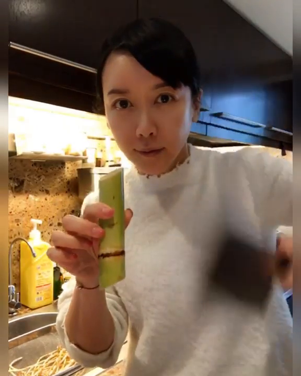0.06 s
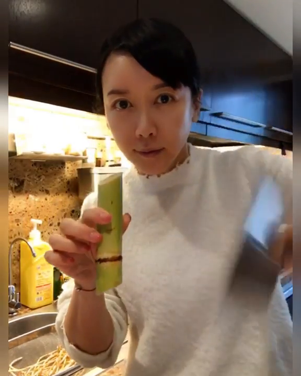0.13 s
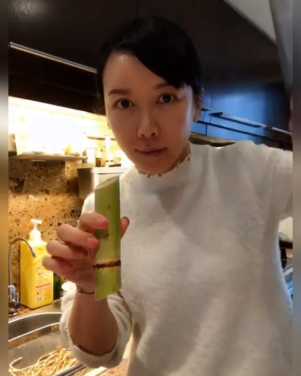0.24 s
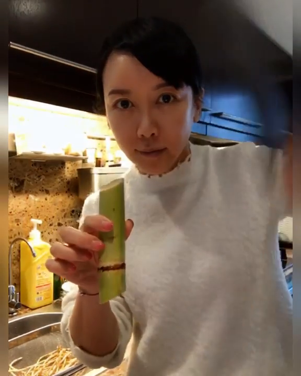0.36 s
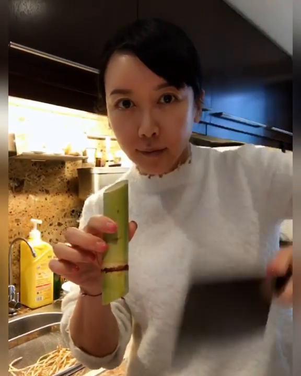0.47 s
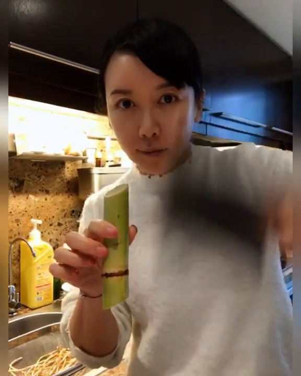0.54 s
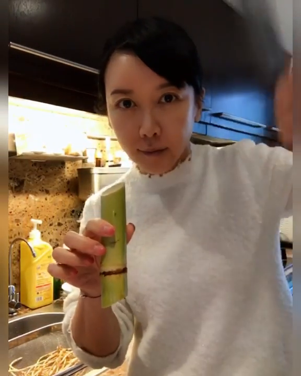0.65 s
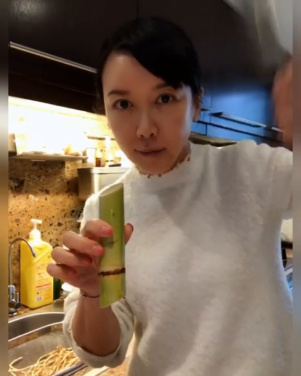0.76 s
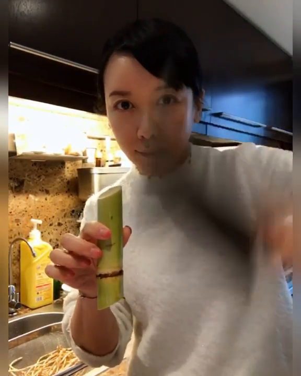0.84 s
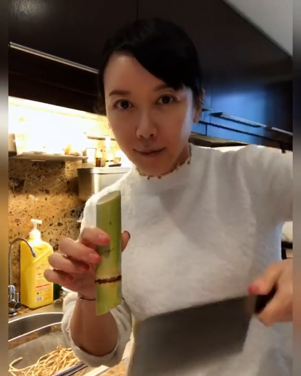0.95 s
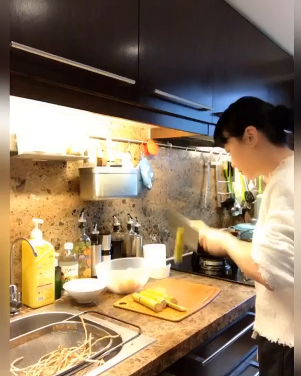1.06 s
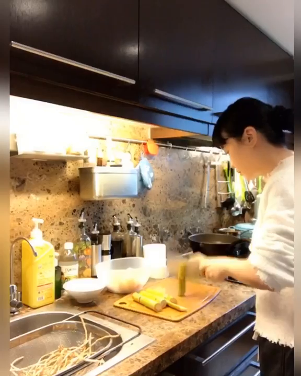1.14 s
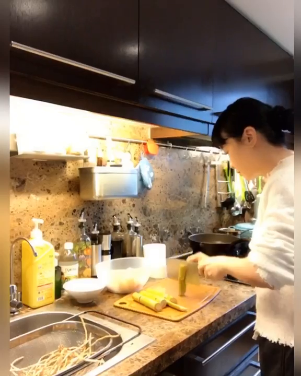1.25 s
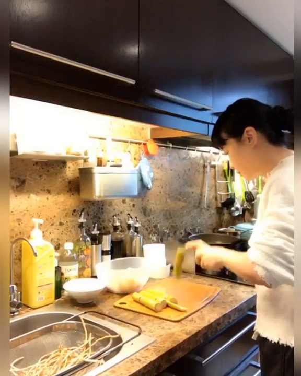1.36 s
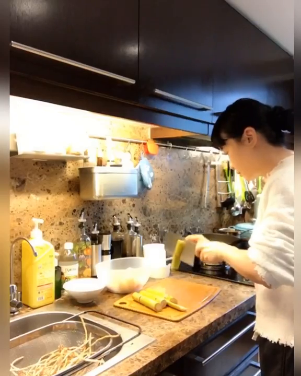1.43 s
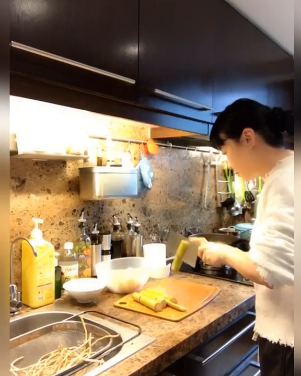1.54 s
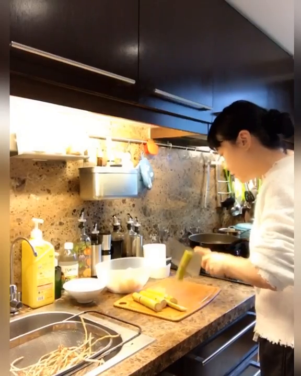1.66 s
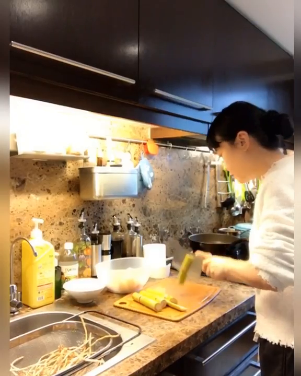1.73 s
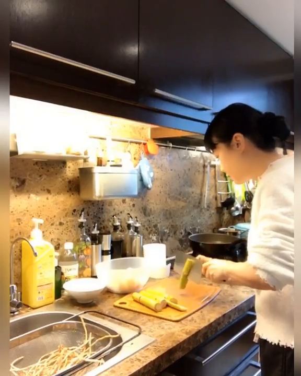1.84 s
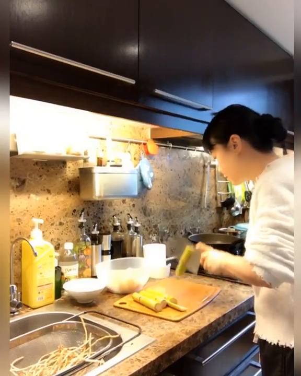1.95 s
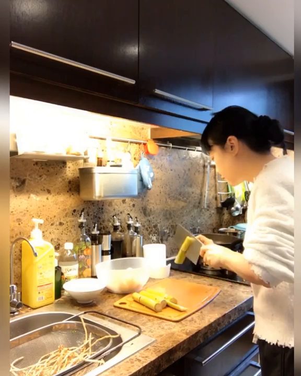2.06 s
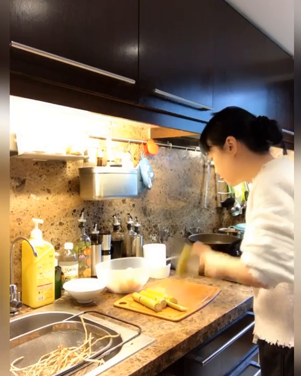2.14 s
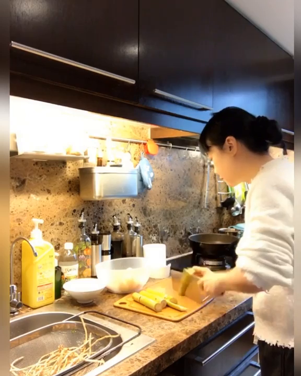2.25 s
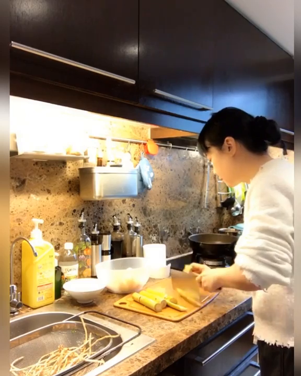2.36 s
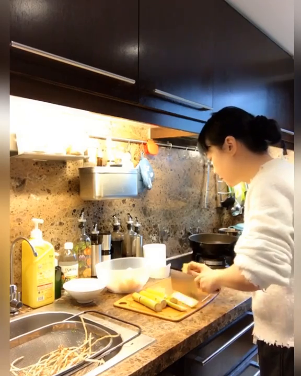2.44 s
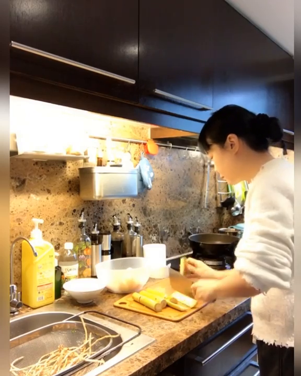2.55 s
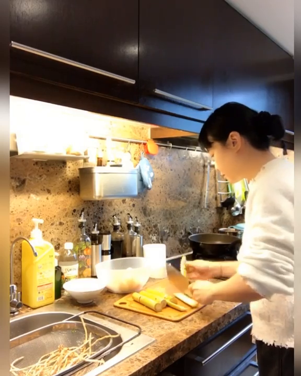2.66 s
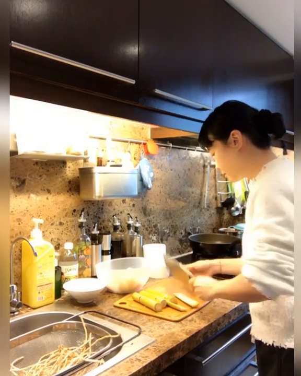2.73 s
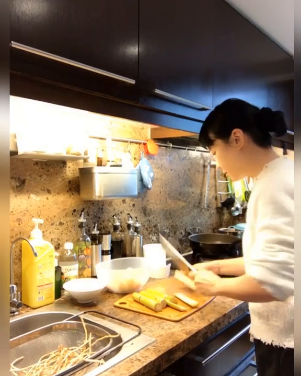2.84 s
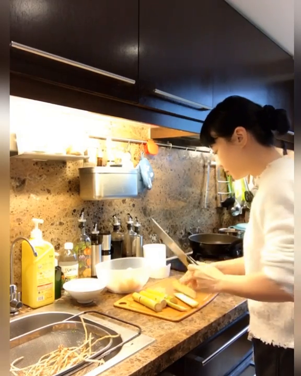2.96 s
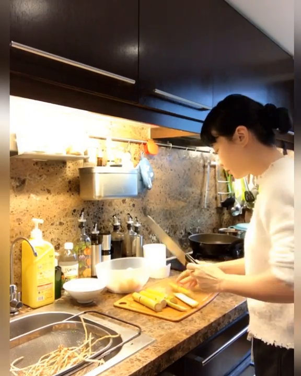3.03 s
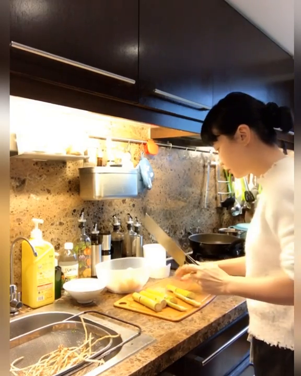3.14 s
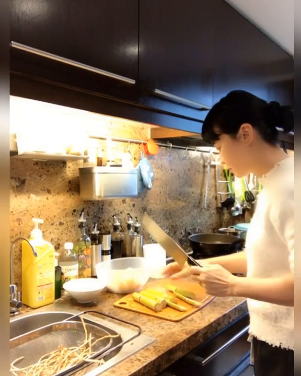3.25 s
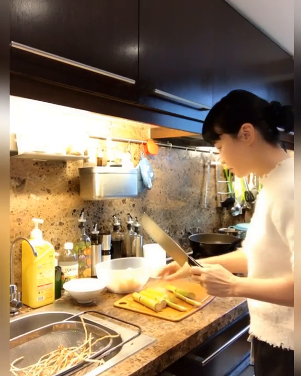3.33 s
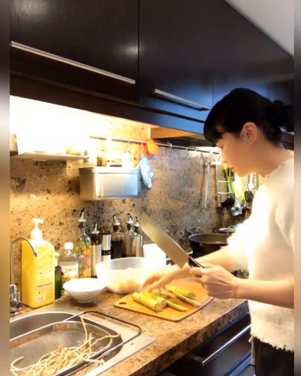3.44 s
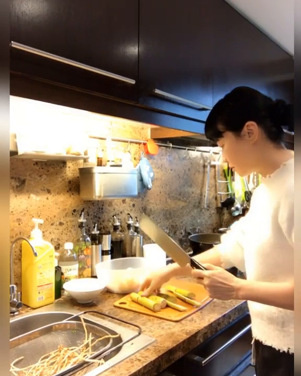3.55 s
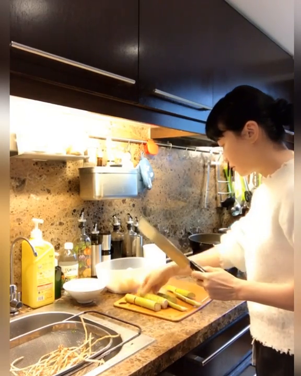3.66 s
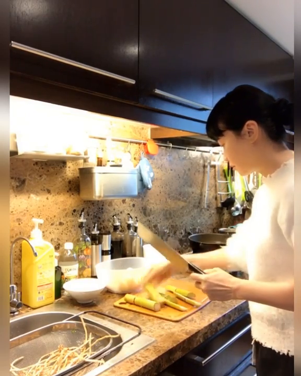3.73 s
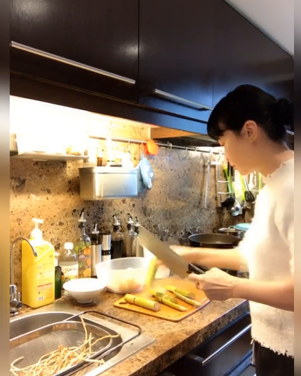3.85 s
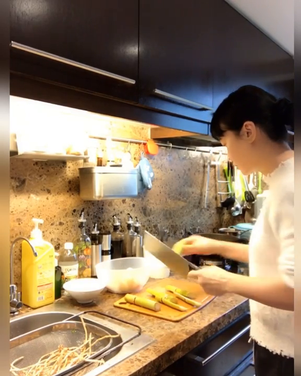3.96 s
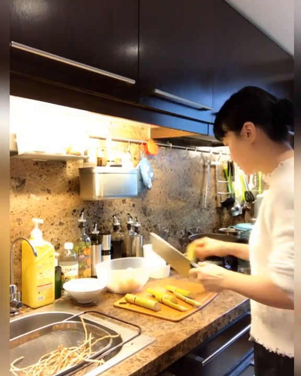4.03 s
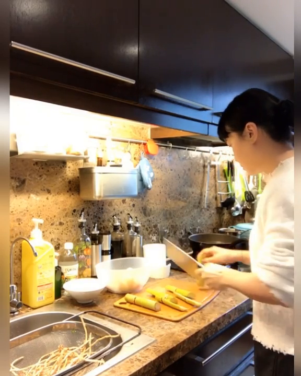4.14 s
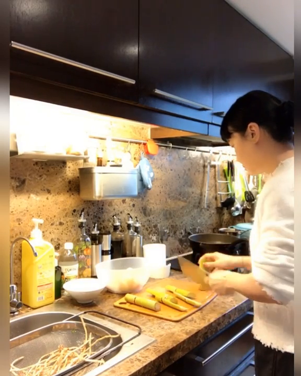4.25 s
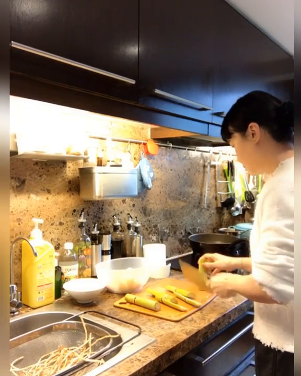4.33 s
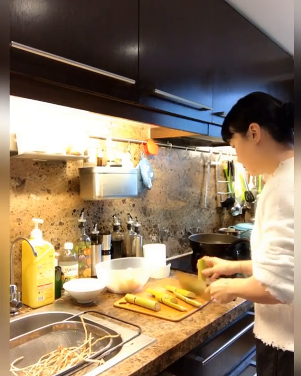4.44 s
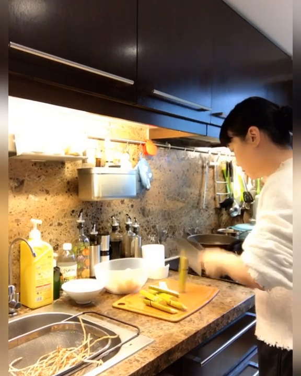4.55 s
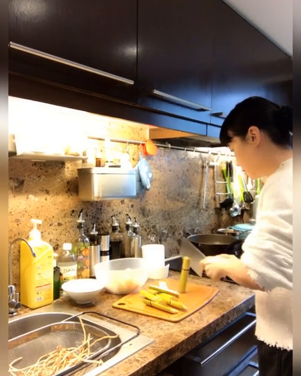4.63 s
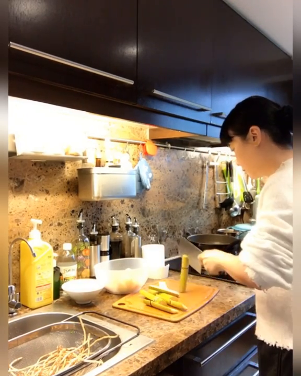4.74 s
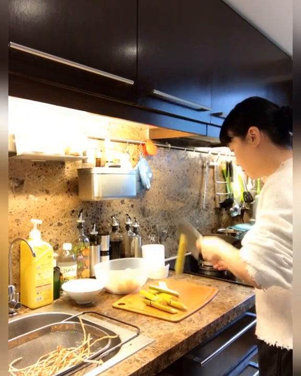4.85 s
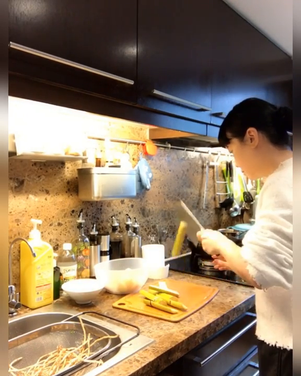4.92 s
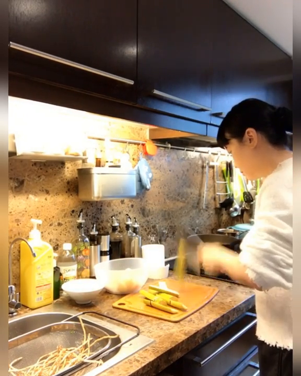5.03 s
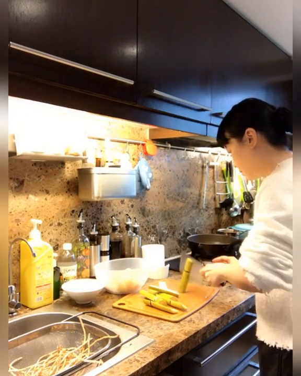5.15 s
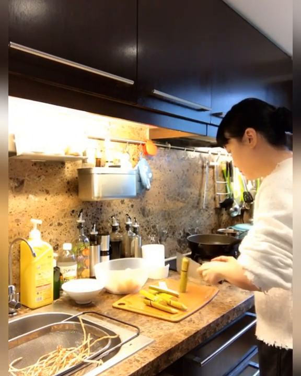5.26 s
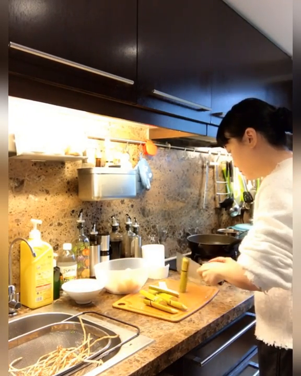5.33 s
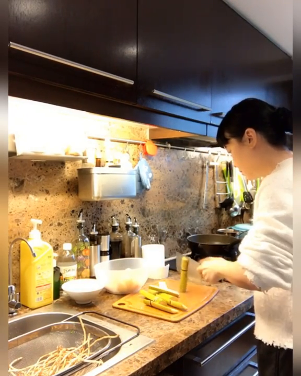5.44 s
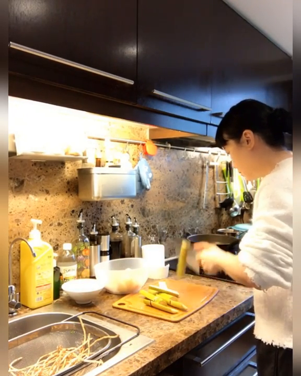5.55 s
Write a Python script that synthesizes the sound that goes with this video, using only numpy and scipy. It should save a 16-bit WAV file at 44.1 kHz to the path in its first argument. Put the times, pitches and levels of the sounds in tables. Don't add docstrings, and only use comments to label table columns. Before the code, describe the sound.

In a small tiled kitchen, a hood hisses and fans drone. After a faint knock and a thin swish, a cleaver chops cane with a woody thud and crack. A heavier multiple blow follows, then scrapes, taps and pieces set down, a bright steel clink, and two last splitting blows, the final one loud and sharp. Picked up by a phone a metre or two away.

```python
import sys
import numpy as np
from scipy import signal
from scipy.fft import rfft, irfft
from scipy.io import wavfile
from scipy.ndimage import uniform_filter1d

SR = 44100
rng = np.random.default_rng(int(sys.argv[2]) if len(sys.argv) > 2 else 0)


def master(y):
    cut = np.clip(np.atleast_2d(y).T, -1, 1)
    pcm = np.round(cut * 32767)
    wavfile.write(sys.argv[1], SR, pcm.astype(np.int16))


def to_linear_factor(level_db):
    exponent = np.asarray(level_db, float) / 20
    return 10 ** exponent


N = 246519
T = np.arange(N) / SR
HALF_S = T[:SR // 2]


def band(x, lo_hz, hi_hz, order=2):
    return signal.sosfilt(signal.butter(order, [lo_hz, hi_hz], "bandpass", fs=SR, output="sos"), x)


def unit(x):
    return x / np.sqrt(np.mean(x ** 2))


def noise():
    return rng.standard_normal(N)


def strikes(start_s, gains):
    return np.bincount((np.asarray(start_s) * SR).astype(int), gains, N)


def ring(x, pitch_hz, t60_s):
    decay = np.log(1000) / (max(t60_s, .005) * SR)
    pole = np.exp(2j * np.pi * pitch_hz / SR - decay)
    return signal.lfilter([1], [1, -pole], x).imag


def burst(x, rise_s, fall_s):
    shape = (1 - np.exp(-HALF_S / rise_s)) * np.exp(-HALF_S / fall_s)
    return np.maximum(signal.fftconvolve(x, shape / shape.max())[:N], 0)


def walk(rate_hz):
    hold = int(SR / rate_hz)
    steps = np.repeat(rng.standard_normal(N // hold + 1), hold)
    w = uniform_filter1d(uniform_filter1d(steps, hold), hold)[:N]
    return w / w.std()


def curve(table):
    return np.interp(T, *np.transpose(table))


def on_log(table, pitch_hz):
    hz, value = np.transpose(table)
    return np.interp(np.log(pitch_hz), np.log(hz), value)


# (pitch_hz, level_db per Hz)
HOOD_SPECTRUM = [(59, -56), (100, -6), (122, -14.5), (166, -4.5), (234, -7.5), (253, -13.5), (343, -12.5),
                 (403, -18), (738, -21), (800, -19.5), (3100, -32), (9210, -42), (12500, -40.5),
                 (16200, -125), (22000, -120)]
# (start_s, level_db)
HOOD_SWELL = [(0, 0), (4.3, -0.6), (4.9, 2)]
# (pitch_hz, width_hz, level_db)
RUMBLE = [(28.2, 32, -48.5), (45, 22, -47), (64.17, 14, -53.5), (156, 22, -60), (360.7, 29, -68)]
# (pitch_hz, level_db, wobble_hz)
DRONES = [(47.8, -44.5, 3.0), (77.2, -50.5, 5.6)]
# (start_s, fan_db, compressor_db)
DRONE_LOAD = [(0, -4, -5), (.42, -0.5, -4), (.55, 6.5, -6), (1.0, 5, 0), (1.301, -2, 2.5), (2.0, 0, 2.5),
              (2.6, 1.5, 0), (4.0, -3.5, 0.5), (4.45, 2.5, -1), (5.59, 1, -1)]
# (start_s, gain_db)
SCENE_CHANGE = [
    (1.035, 0.5),
    (1.062, 0.5),
    (1.078, -5),
    (1.09, 0.5),
]


def machines():
    hz = np.maximum(np.fft.rfftfreq(N, 1 / SR), 1)
    shape = to_linear_factor(on_log(HOOD_SPECTRUM, hz)) * (hz > 95)
    hood_db = -52.5
    out = unit(irfft(rfft(noise()) * shape, N)) * to_linear_factor(hood_db + curve(HOOD_SWELL))
    for pitch_hz, width_hz, level_db in RUMBLE:
        out += to_linear_factor(level_db) * unit(band(noise(), pitch_hz - width_hz / 2, pitch_hz + width_hz / 2))
    start_s, *loads_db = np.transpose(DRONE_LOAD)
    for (pitch_hz, level_db, wobble_hz), load_db in zip(DRONES, loads_db):
        tone = np.sin(2 * np.pi * np.cumsum(pitch_hz + wobble_hz * walk(11)) / SR)
        waver_db = 1.9 * walk(5) + 3.6 * walk(12)
        out += to_linear_factor(4 + level_db + np.interp(T, start_s, load_db) + waver_db) * tone
    return out * to_linear_factor(curve(SCENE_CHANGE))


# (start_s, push_db, contact_ms, snap_db)
CANE = [(0.019, -50, 3.7, -46), (1.079, -23, 1.54, -20), (2.145, -17.5, 2.25, -29), (2.149, -13, 2.4, -38),
        (2.171, -14, 1.144, -22.5), (2.31, -28, 3.1, -43), (2.386, -44.5, 1.16, -88),
        (2.847, -38, 16, -64.5), (2.896, -50, 2.7, -68), (2.944, -29.5, 6.1, -76.5), (2.974, -55, 2.4, -73),
        (3.008, -50.5, 4.7, -54), (4.197, -29, 4.4, -68), (4.224, -42, 13, -77.5), (4.553, -20.5, 3.5, -48),
        (4.562, -20, 1.5, -43.5), (5.018, -15, 1.83, -20.5), (5.021, -10, 1.69, -19)]
# (start_s, push_db, contact_ms, tick_db)
EDGES = [
    (1.083, -11, 3.8, -18),
    (2.327, -43, 3.4, -58),
    (2.393, -27.5, 1.87, -65),
    (2.516, -31, 5.4, -58),
    (3.377, -49.5, 6.7, -47.5),
    (3.43, -42.5, 2.13, -50.5),
    (3.456, -54, 1.9, -64),
    (3.497, -62, 3.1, -57),
    (3.59, -43, 2.44, -52),
]
# (start_s, push_db, contact_ms, tick_db)
STEEL = [
    (2.546, -38, 12, -41),
    (4.406, -30, 1.19, -26),
    (4.429, -43.5, 0.76, -30),
    (4.454, -47, 3.3, -19),
]
BAND_HZ = (130, 350, 900, 2200, 5000, 11500)
PUSH_DB = (-1, 9, 24.5, 17, 0)
SNAP_DB = (-30.5, -13.5, -10.5, -1, 1.5)
TICK_DB = (-33.5, -19, -6, 1, -7)


def range_levels(rows, sharp_db):
    _, push_db, contact_ms, edge_db = np.transpose(rows)
    mid_hz = np.sqrt(np.multiply(BAND_HZ[:-1], BAND_HZ[1:]))[:, None]
    soft_db = 38 * np.log10(1 + (mid_hz * contact_ms * 1e-3) ** 2)
    body_db = push_db + np.reshape(PUSH_DB, (-1, 1)) - soft_db + soft_db[0]
    top_db = edge_db + np.reshape(sharp_db, (-1, 1))
    return 20 * np.log10(np.hypot(to_linear_factor(body_db), to_linear_factor(top_db)))


def contacts():
    start_s = np.transpose(CANE + EDGES + STEEL)[0]
    return start_s, np.hstack([range_levels(CANE, SNAP_DB), range_levels(EDGES + STEEL, TICK_DB)])


# (rise_s, fall_s, level_db, early_fall_s, early_db, late_fall_s, late_db)
RANGES = [(0.0026, 0.012, -15, 0.035, -13, 0.078, -24.5), (0.00092, 0.0023, -6, 0.034, -10.5, 0.046, -11.5),
          (0.0012, 0.0037, -0.5, 0.017, -8, 0.073, -19), (.0005, 0.004, 1, 0.0084, -11, .055, -16),
          (0.00066, 0.0029, -1, 0.018, -4, 0.061, -16)]


def cracks(start_s, levels_db):
    grains = noise() * to_linear_factor(4.4 * noise())
    out = 0
    for range_db, (rise_s, fall_s, level_db, *_), lo_hz, hi_hz in zip(levels_db, RANGES, BAND_HZ, BAND_HZ[1:]):
        envelope = burst(strikes(start_s, to_linear_factor(range_db)), rise_s, fall_s)
        out = out + to_linear_factor(level_db) * envelope * unit(band(grains, lo_hz, hi_hz))
    return out


def wash(start_s, levels_db):
    share_db = -2.5 * (np.arange(len(start_s)) >= len(CANE + EDGES))
    out = 0
    for range_db, (*_, early_s, early_db, late_s, late_db), lo_hz, hi_hz in zip(
            levels_db, RANGES, BAND_HZ, BAND_HZ[1:]):
        blows = strikes(start_s, to_linear_factor(range_db + share_db))
        spread = to_linear_factor(early_db) * burst(blows, 0.0023, early_s) + to_linear_factor(late_db) * burst(blows, 0.0074, late_s)
        out = out + spread * unit(band(noise(), lo_hz, hi_hz))
    return out


# (pitch_hz, level_db, t60_s)
BOARD = [(473, -6.5, 0.092), (510, -17, 0.067), (554.3, -7, 0.23), (612, -9.5, 0.18), (700, -8.5, 0.1),
         (811, -8, 0.13), (870, -14, 0.12), (911, -16, 0.088), (979, -6, 0.19), (1112, -4, 0.13),
         (1213, -5.5, 0.087), (1345, -7, 0.076), (1443, -3, 0.16), (1436, -8, .12)]
# (pitch_hz, level_db, t60_s)
COUNTER = [(77, -12.5, 0.49), (150, -9, 0.14), (170.2, -1.5, .33), (185.8, 5.5, 0.052), (231, -7.5, 0.29),
           (270, -13.5, 0.073), (314, -17, 0.13), (393, -11, 0.13)]


def thuds(start_s, levels_db):
    board, counter = np.zeros(N), np.zeros(N)
    for pitch_hz, level_db, t60_s in BOARD:
        spot = rng.standard_normal(len(start_s))
        range_db = levels_db[1 + (pitch_hz > BAND_HZ[2])]
        push = strikes(start_s + .001, np.sign(spot) * to_linear_factor(range_db + 2.7 * spot))
        board += to_linear_factor(level_db + 3.5) * ring(push, pitch_hz, .6 * t60_s)
    for k, (pitch_hz, level_db, t60_s) in enumerate(COUNTER):
        spot = rng.standard_normal(len(start_s))
        push = strikes(start_s + .004, to_linear_factor(levels_db[0] + 2 * spot))
        counter += (-1) ** k * to_linear_factor(level_db - 2.5) * ring(push, pitch_hz, t60_s)
    counter += to_linear_factor(-1.5) * ring(strikes(start_s + .002, to_linear_factor(levels_db[0])), 207, 0.03)
    return board + band(counter, 44, 500)


# (pitch_hz, t60_s)
KITCHEN_T60 = [(250, .35), (700, 0.82), (1800, 0.4), (4000, 0.1), (7000, 0.22), (11000, 0.28)]


def kitchen(x, wet_db, gap_s=0.001, build_s=0.005):
    tail = 0
    for pitch_hz in 300 * 2 ** np.arange(0, 5.4, .25):
        part = band(rng.standard_normal(len(HALF_S)), pitch_hz / 1.09, pitch_hz * 1.09)
        part = part * to_linear_factor(-60 * HALF_S / on_log(KITCHEN_T60, pitch_hz))
        tail = tail + unit(part) * np.sqrt(pitch_hz)
    tail *= 1 - np.exp(-np.maximum(HALF_S - gap_s, 0) / build_s)
    return to_linear_factor(wet_db) * signal.fftconvolve(x, tail / np.sqrt(np.sum(tail ** 2)))[:N]


# (start_s, length_s, pitch_hz, glide_hz_per_s, level_db)
SWISHES = [
    (.66, 0.39, 3270, 797, -66),
    (1.96, 0.17, 3100, -200, -59),
]


def swish():
    out, fade_s = 0, .04
    for start_s, length_s, pitch_hz, glide_hz_per_s, level_db in SWISHES:
        age_s = T - start_s
        tone = np.sin(2 * np.pi * (pitch_hz + glide_hz_per_s * age_s / 2) * age_s)
        fade = np.clip(np.minimum(age_s, start_s + length_s - T) / fade_s, 0, 1)
        out = out + to_linear_factor(level_db - 5.5) * fade * tone * walk(470)
    return out


# (start_s, level_db)
SHAKES = [
    (1.084, -19),
    (2.172, -11),
    (4.562, -21),
    (5.021, -15),
]
# (pitch_hz, level_db, t60_s)
BOWLS = [(2116, -15, .5), (2127, -22, .35), (2360, -25, .22), (2447, -16, .5), (2456, -21, .4)]


def crockery():
    start_s, level_db = np.transpose(SHAKES)
    shake = strikes(start_s, to_linear_factor(level_db))
    return sum(to_linear_factor(db) * ring(shake, pitch_hz, t60_s) for pitch_hz, db, t60_s in BOWLS)


# (start_s, level_db, spot 0 tip 1 heel 2 flat, grip share of t60)
CLINKS = [
    (2.148, -42.5, 2, 0.45),
    (2.171, -39.5, 2.5, 0.35),
    (2.329, -54.5, 2.5, 0.5),
    (2.552, -46, 0, 0.7),
    (4.407, -29.5, 1, 0.9),
    (4.433, -44, 4, .5),
    (4.456, -24.5, 2.5, 0.48),
    (4.478, -38, 0.5, 0.68),
]
BLADE_HZ = (1710, 2078, 2250, 2401, 2680, 2893, 3618, 3865, 4075, 4750, 5283, 5316, 5771, 6266, 6770, 6805,
            7036, 8230, 8710, 9825, 9870, 10615, 11270)
# (t60_s, tip_db, heel_db, flat_db)
BLADE_MODES = [(0.25, -8, -14, -16.5), (0.3, -25, 1, -6), (.2, -34, -4, -4.5), (.12, -31.5, -2.5, -0.5),
               (0.3, 0, -5, -9), (0.14, -12.5, 1.5, 2), (0.43, -26.5, -14, -7.5), (.15, -8.5, -15, -14),
               (0.11, -12.5, -25, -5.5), (0.18, -24.5, -20, -14.5), (0.3, -4, -21, 0.5),
               (0.16, -7, -4.5, -3.5), (0.21, -7.5, -15, -13.5), (.2, -24.5, -22.5, -21.5),
               (0.3, -15.5, -17, -6), (.12, -24, -23.5, -14.5), (0.19, -8, -20.5, -19),
               (.3, -15, -22.5, -17), (0.16, -24.5, -27.5, -21), (0.14, -6, -22, -7), (0.0802, -6, -25, -4),
               (.25, -12.5, -24.5, -23.5), (.1, -19.5, -31, -27)]
# (start_s, gain_db)
BLADE_MUTE = [
    (4.5, 2),
    (4.52, -2),
    (4.6, -8),
]


def blade():
    out = np.zeros(N)
    bite = 1 - np.exp(-HALF_S / .001)
    for start_s, level_db, spot, grip in CLINKS:
        i = int(start_s * SR)
        for pitch_hz, (t60_s, *spots_db) in zip(BLADE_HZ, BLADE_MODES):
            mode_db = level_db + np.interp(spot, range(len(spots_db)), spots_db)
            decay = to_linear_factor(mode_db - 60 * HALF_S / (t60_s * grip))
            out[i:i + len(HALF_S)] += decay * bite * np.sin(2 * np.pi * pitch_hz * HALF_S)
    return out * to_linear_factor(curve(BLADE_MUTE))


# (start_s, pitch_hz, level_db, t60_s)
TICKS = [(3.377, 4500, -43, .06), (3.377, 3380, -50, .04), (3.377, 2250, -52, .13), (3.497, 2350, -48, .06),
         (3.5, 1480, -50, .13), (3.55, 1480, -49, .08), (3.592, 1020, -48, .13), (3.59, 2750, -55, .09),
         (4.198, 1520, -50, .07), (2.548, 3900, -46, .06), (4.455, 3110, -33, .09), (4.407, 2960, -33, .07),
         (4.2, 520, -42, .12), (2.947, 560, -45, .15), (3.431, 780, -41, .1), (4.2, 760, -43, .1),
         (2.947, 380, -44, .1), (3.432, 1150, -45, .08), (2.395, 1150, -33, .1), (2.174, 1120, -17, .12),
         (2.174, 1330, -18, .1)]


def ticks():
    return sum(to_linear_factor(level_db) * ring(strikes([start_s], [1]), pitch_hz, t60_s)
               for start_s, pitch_hz, level_db, t60_s in TICKS)


# (peak_s, level_db, rise_s, fall_s)
RUBS = [
    (2.332, -35, .045, .012),
    (2.536, -33.5, 0.12, .013),
    (2.55, -55, 0.0055, .11),
    (3.526, -38.5, 0.031, .085),
    (4.448, -52, 0.28, .005),
    (4.456, -35, .01, .07),
    (4.56, -26, .014, .002),
]


def rubbing():
    grit = unit(band(noise() * to_linear_factor(1.67 * noise()), 2000, 17000))
    slide = 0
    for peak_s, level_db, rise_s, fall_s in RUBS:
        drop_db = 20 * np.maximum((peak_s - T) / rise_s, (T - peak_s) / fall_s)
        slide = slide + to_linear_factor(level_db - 16.5 - drop_db) * (T > peak_s - 1.6 * rise_s)
    return grit * to_linear_factor(1.5 * walk(60)) * slide


def scene():
    start_s, levels_db = contacts()
    near = cracks(start_s, levels_db) + rubbing() + ticks()
    blows = wash(start_s, levels_db) + thuds(start_s, levels_db) + crockery()
    steel = blade()
    room = kitchen(near, -6.0) + kitchen(steel, -4.0)
    return (machines() + near + blows + steel + room + swish())[None]


def low_pass(x):
    return signal.sosfilt(signal.butter(12, 12620, fs=SR, output="sos"), x)


def record(dry):
    rounded = 1.4 * np.tanh(dry / 1.917)
    mix = signal.sosfilt(signal.cheby2(8, 50, 12700, fs=SR, output="sos"), rounded)
    return low_pass(mix)


dry = scene()
out = record(dry)
master(out)
```